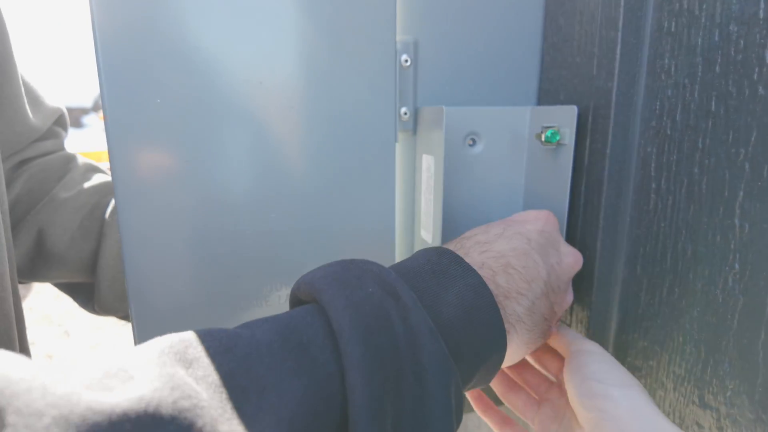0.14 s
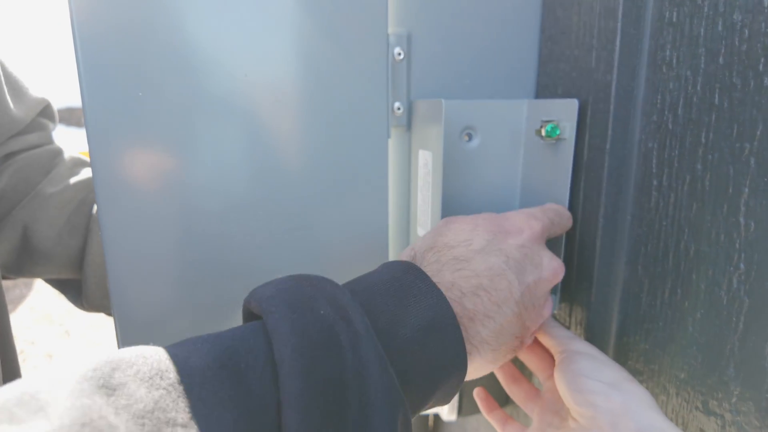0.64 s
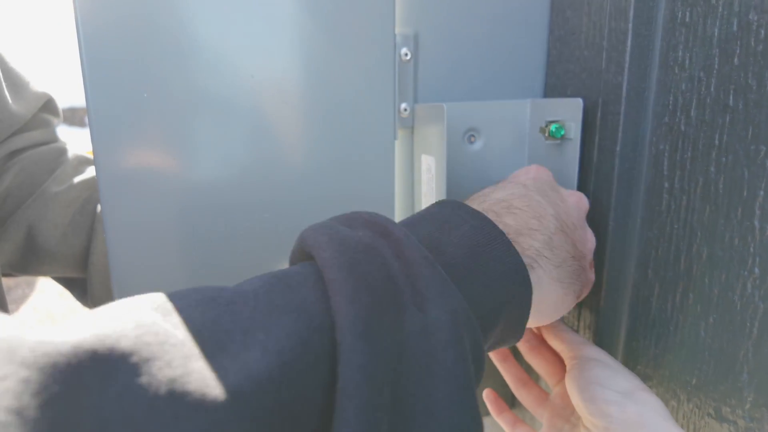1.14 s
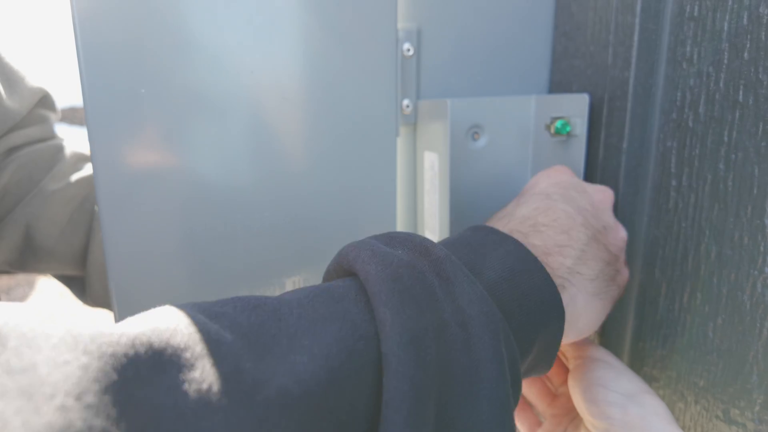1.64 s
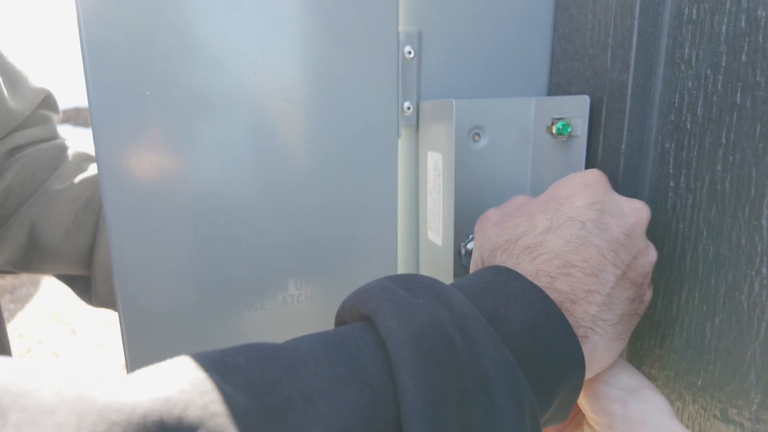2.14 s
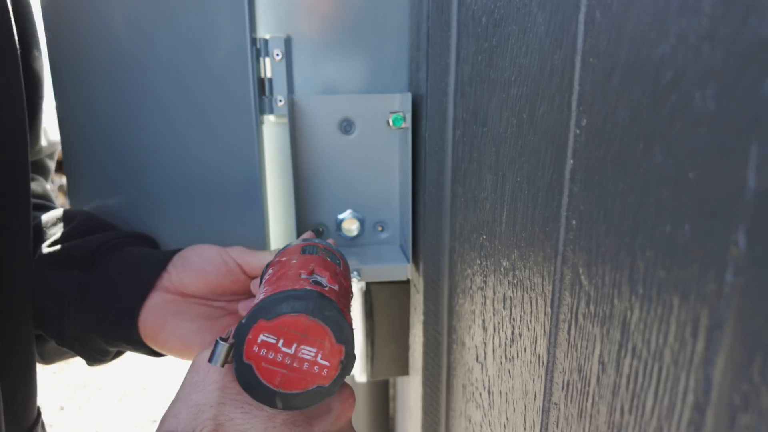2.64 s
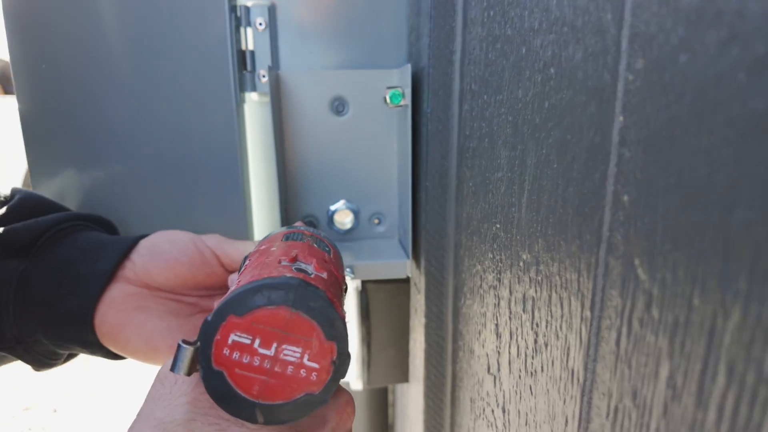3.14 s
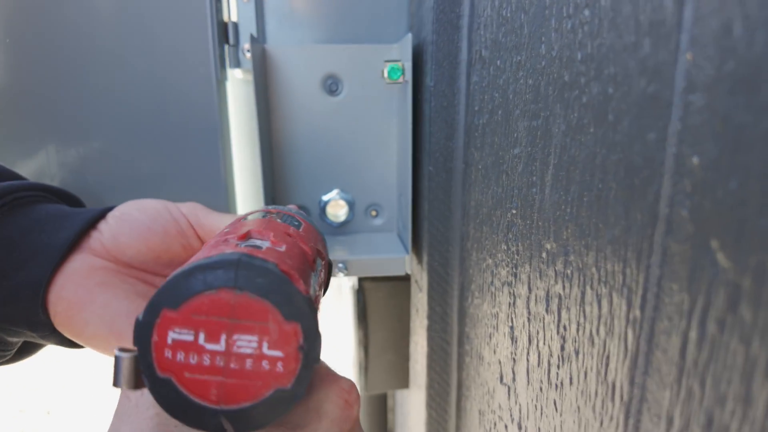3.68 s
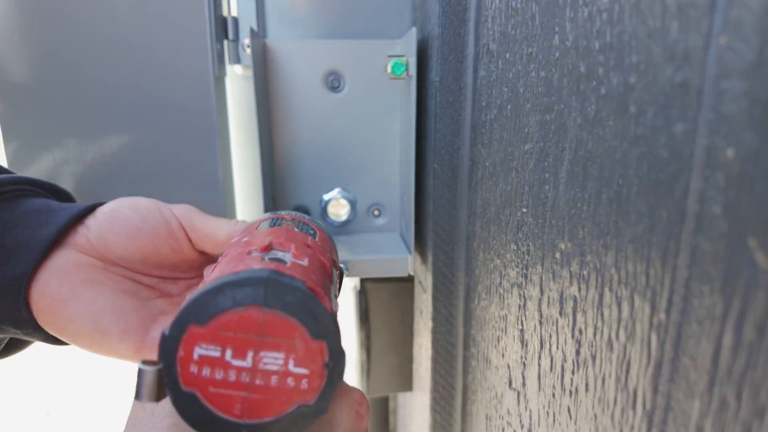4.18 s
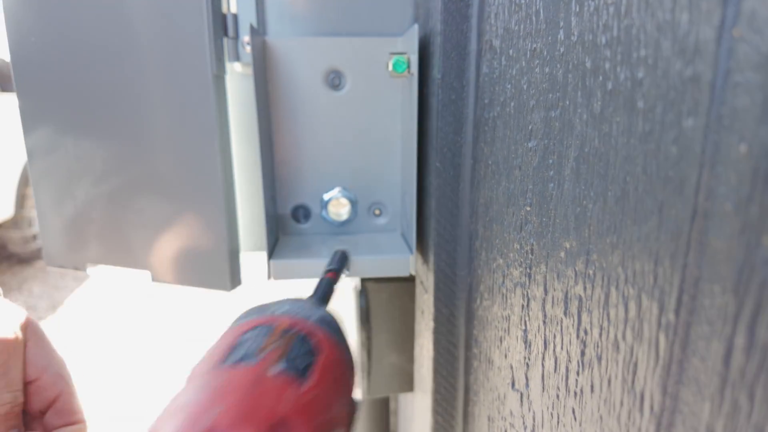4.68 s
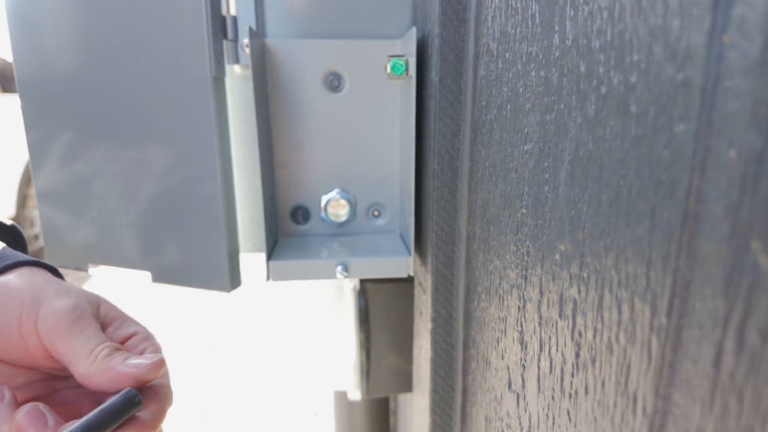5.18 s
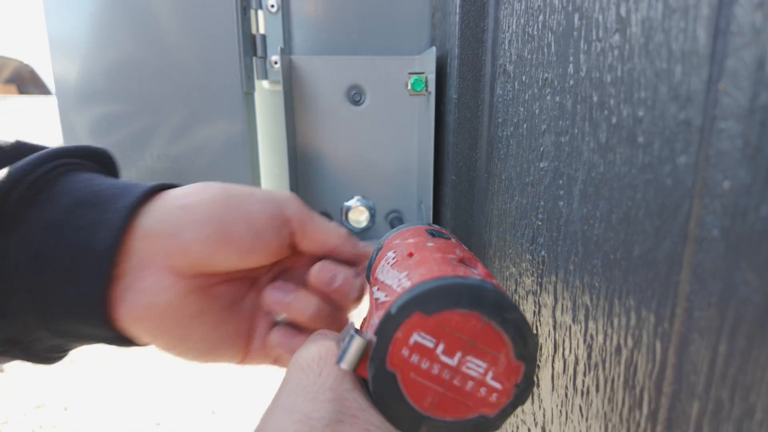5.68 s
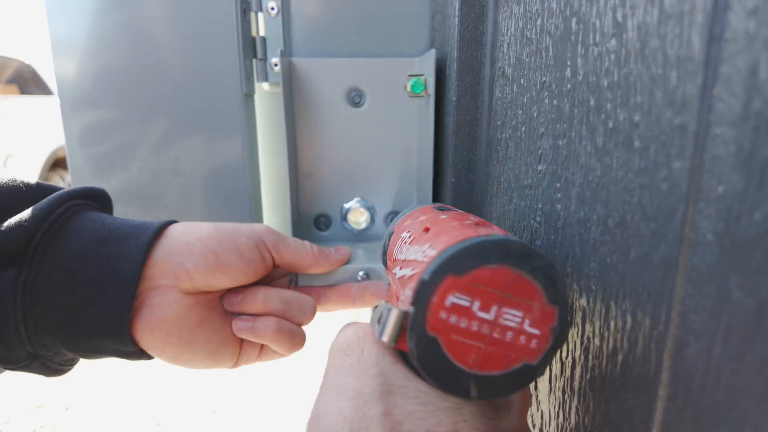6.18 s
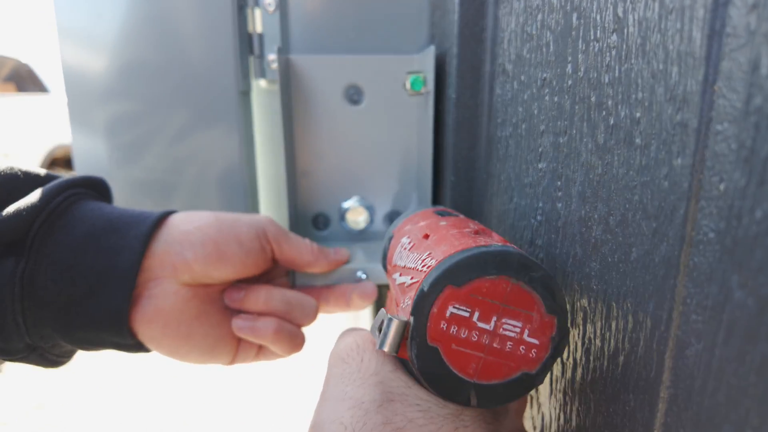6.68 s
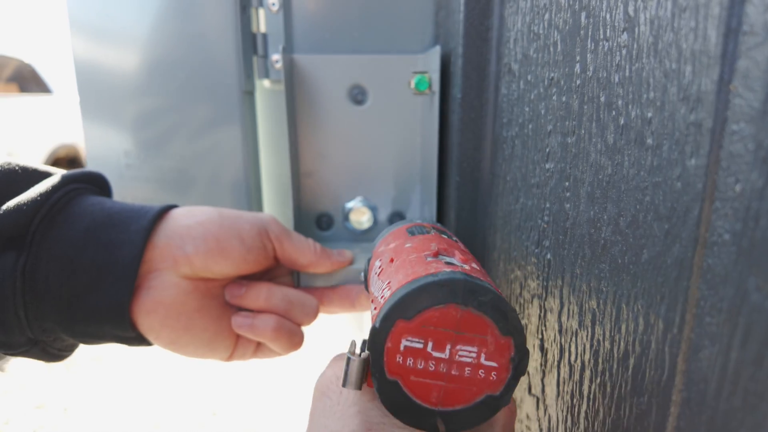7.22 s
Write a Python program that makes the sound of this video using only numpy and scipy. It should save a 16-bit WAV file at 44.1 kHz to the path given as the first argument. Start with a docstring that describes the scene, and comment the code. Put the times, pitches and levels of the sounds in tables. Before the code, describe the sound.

Fingers thread a nut on a sheet-steel box with taps and scrapes, then a cordless impact driver hammers in three loud, ringing bursts.

```python
"""A cordless impact driver runs three bursts on a sheet-steel box: the motor spins up, then its hammer strikes
the anvil about 55 times a second. Each blow is a short push sent through the box's own modes, which ring on after
each burst. Before that, fingers thread a nut onto a bolt: taps and noisy scrapes pass through the same kind of box.
Faint shaped noise makes the quiet outdoor air. One close microphone hears it all through a peak limiter."""
import sys
import numpy as np
from scipy import signal
from scipy.fft import rfft, irfft, next_fast_len
from scipy.io import wavfile
from scipy.ndimage import uniform_filter1d, minimum_filter1d

SR = 44100
rng = np.random.default_rng(int(sys.argv[2]) if len(sys.argv) > 2 else 0)


def int16_out(signal):
    """Quantize to a 16-bit WAV file."""
    q = np.round(np.clip(np.atleast_2d(signal).T, -1, 1) * 32767)
    wavfile.write(sys.argv[1], SR, q.astype(np.int16))


def amplitude_ratio(level_db):
    """Convert a level in decibels to the matching linear amplitude (field) ratio."""
    exponent = np.asarray(level_db, float) / 20
    return 10 ** exponent


N = 323253
T = np.arange(N) / SR  # seconds
FADE_OUT_S = 5.41  # the first fastener's ring is faded out here; the second fastener comes after this

# Tone of the box under fingers. Each row: frequency in Hz, relative level in dB per Hz.
TOUCHED = [(24, -66), (40, -6), (444, 4), (1070, -20), (1210, -3.5), (1760, -13), (1950, -9), (4340, -19.5),
           (10700, -40), (16000, -63.5)]
# Half blows as the hammer first meets the anvil. Each entry: time in seconds.
HALF_BLOWS_S = [3.499, 5.999, 6.931, 6.9413]


def colour(x, points):
    """Shape the spectrum of x by (Hz, dB) points, joined by straight lines over log frequency."""
    hz, db = np.transpose(points)
    f = np.maximum(np.arange(len(x) // 2 + 1) * SR / len(x), 1)
    gain = amplitude_ratio(np.interp(np.log(f), np.log(hz), db))
    return irfft(rfft(x) * gain, len(x))


def unit(x):
    """Scale to energy 1 along the last axis."""
    return x / np.sqrt(np.sum(x ** 2, axis=-1, keepdims=True))


def split(x):
    """Three bands: boom below 700 Hz, clang between, crack above 2800 Hz."""
    bands = []
    for hz, kind in ((700, "low"), ((700, 2800), "band"), (2800, "high")):
        sos = signal.butter(3, hz, kind, fs=SR, output="sos")
        bands.append(signal.sosfilt(sos, x))
    return np.array(bands)


def modes(table, t):
    """Fading sines, each started at rest; t60 is the time to fade by 60 dB."""
    return sum(amplitude_ratio(db) * np.sin(2 * np.pi * hz * t) * 1000. ** (-t / t60) for hz, db, t60 in table)


def box(points, fade, panel_db, quick_s, linger_db):
    """Answer of the steel box to one push, by band: crowded modes as fading noise, plus a few panel modes."""
    # Fading of the crowded modes. Each row: frequency in Hz, t60 in seconds before the fade factor.
    dense_t60 = [(60, 1), (300, 0.75), (1000, 0.71), (3000, 0.51), (6000, 0.36), (16000, 0.24)]
    # Short panel modes. Each row: frequency in Hz, relative level in dB.
    panel_modes = [(112, -17), (180, -4), (302, -4), (508, -3), (567, 2), (934, -6), (1005, -2), (1180, -1),
                   (1389, -4), (1742, -3.5)]
    t = T[:3 * SR // 2]
    hz, t60 = np.transpose(dense_t60)
    burst = rng.standard_normal(len(t))
    # among the sheet's crowded modes a few stand out as thin lines
    line_gain = amplitude_ratio(3.4 * rng.exponential(size=len(t) // 2 + 1))
    sheet = irfft(rfft(burst) * line_gain, len(t))
    dense = 0
    for f in 45 * 2 ** np.arange(0, 8.6, .5):
        band = signal.butter(2, (f / 1.19, min(f * 1.19, 20000)), "band", fs=SR, output="sos")
        noisy, lined = unit(signal.sosfilt(band, [burst, sheet]))
        # most energy leaves at once through the contact, sooner in the treble; the rest lingers in the sheet
        quick = quick_s * (f / 1000) ** -.5
        slow = np.interp(np.log(f), np.log(hz), t60) * fade
        leaving = noisy * 1000. ** (-t / quick)
        lingering = amplitude_ratio(linger_db) * lined * 1000. ** (-t / slow)
        dense = dense + unit(leaving + lingering) * np.sqrt(f)
    # 2000 samples of room in front while the tone is shaped
    size = next_fast_len(len(t) + SR)
    padded = np.roll(np.pad(dense, (0, size - len(t))), 2000)
    dense = np.roll(colour(padded, points), -2000)[:len(t)]
    # higher panel modes fade faster
    panel = modes([(f, db, 0.15 * fade * (f / 1000) ** -.4) for f, db in panel_modes], t)
    return unit(split(unit(dense) + amplitude_ratio(panel_db) * unit(panel)))


def strike(push, answer):
    """Send each band of the pushes through its band of the box and add them up."""
    return signal.fftconvolve(push, answer, axes=1)[:, :N].sum(axis=0)


def pushes(times, band_db, chatter_s, tick):
    """At each time a sharp tick and a chatter of contact that swells and fades, with a level for each band."""
    out, t = np.zeros((3, N + 4000)), T[:4000]
    chance = rng.standard_normal((len(times), len(t)))
    for s, db, c, length in zip(times, band_db, chance, np.maximum(chatter_s, 1e-4)):
        chatter = unit(c * np.sqrt(t / length) * np.exp(-t / length))
        burst = unit(chatter + tick * (t == 0))
        first = int(s * SR)
        out[:, first:first + len(t)] += np.outer(amplitude_ratio(db), burst)
    return out[:, :N]


def faded_out(x):
    """From FADE_OUT_S on, x fades out within a few hundredths of a second."""
    return x * np.exp(-np.maximum(T - FADE_OUT_S, 0) / .02)


def air():
    """A faint low outdoor murmur: noise shaped in tone and set to an rms of -61 dB."""
    # Tone of the murmur. Each row: frequency in Hz, relative level in dB per Hz.
    murmur_tone = [(15, -32.5), (25, 12.5), (575, -19), (734, -24), (1190, -21.5), (16000, -49)]
    x = colour(rng.standard_normal(N), murmur_tone)
    return amplitude_ratio(-61) * x / np.std(x)


def rub():
    """Thread and skin catch and slip: dense tiny clicks of uneven size into a box that fades very soon."""
    # Finger strokes on nut and tool. Each row: time of peak in seconds, scrape (middle band) in dB,
    # rumble relative to the scrape in dB, seconds to swell by 20 dB, seconds to fade by 20 dB.
    strokes = [(0.03, -62.5, 14, 0.18, 0.14), (0.19, -59, 6.5, 0.18, 0.37), (0.34, -49, 0, 0.17, 0.13),
               (0.47, -60.5, -3, 0.16, 0.42), (0.63, -63.5, 20.5, 0.047, 0.13),
               (0.669, -37.5, -4, 0.03, 0.034), (0.83, -50.5, -8, 0.34, 0.12), (1.27, -53, -8, 0.11, 0.028),
               (1.36, -55, -10, 0.059, 0.55), (1.438, -31.5, -9, 0.044, 0.057),
               (1.55, -54.5, -2, 0.35, 0.069), (1.799, -36.5, -4.5, 0.017, 0.095),
               (1.829, -37, -24, 0.049, 0.041), (1.93, -65.5, -4, 0.093, 0.28),
               (2.11, -33.5, -10.5, .014, 0.08), (2.5, -57, -4, 0.174, 0.03),
               (2.53, -47.5, -14, 0.022, 0.031), (2.59, -46, -28, 0.046, 0.034),
               (2.641, -49.5, -27, 0.22, 0.0053), (2.71, -78, 18, 0.077, 0.68),
               (3.075, -58.5, 5, 0.023, 0.53), (3.41, -67, 3.5, 0.23, 0.098), (5.7, -58, -10, 0.049, 0.15)]
    size = amplitude_ratio(2.5 * np.minimum(rng.exponential(size=N), 6))
    grit = rng.standard_normal(N) * size * (rng.random(N) < .15)
    power = 0
    for s, peak_db, rumble_db, swell, fade in strokes:
        db = peak_db - 20 * np.where(T < s, (s - T) / swell, (T - s) / fade)
        # harder rubbing is brighter
        bands_db = np.array([db + rumble_db, db, 1.168 * db + 0.5])
        power = power + amplitude_ratio(bands_db) ** 2
    push = np.sqrt(power) * grit / np.std(grit)
    return strike(push, box(TOUCHED, fade=0.069, panel_db=-1.0, quick_s=0.048, linger_db=-13.5))


def knocks():
    """Single taps on steel; the one at 4.72 s meets a box with stronger panel modes and a shorter fade."""
    # Knocks of nut, washer and bit. Each row: start in seconds, level in dB before the shared lift below,
    # boom relative to that level in dB, crack relative to that level in dB.
    taps = [(0.027, -27.5, -7.5, -16), (0.09, -39, -20, -8), (0.212, -18.5, -8, -10), (0.317, -33, -42, -4),
            (0.473, -36.5, -9, -7.5), (0.644, -31, -8, -8), (0.748, -28, -17, -6.5), (0.826, -43, -41, -1),
            (1.037, -16.5, -8.5, -9.5), (1.216, -43, -23, -1.5), (1.248, -40, -29, -0.5),
            (1.334, -40.5, -5, -11), (1.557, -44, 5.5, -31), (1.38, -39.5, -20, -2.5),
            (1.623, -46, -27, -16), (1.669, -39.5, -23, -3), (1.703, -42, 0.5, -15), (2.003, -39, 7.5, -15),
            (2.043, -46, -6, -5), (2.135, -22, -28.5, -0.5), (2.362, -44.5, -7, -12), (2.392, -45, -6, -13),
            (2.422, -28, 1.5, -15.5), (2.574, -39.5, -31, 1), (2.677, -49, 4.5, 3), (3.097, -42, 10, -30),
            (3.151, -42.5, 0.5, -10), (3.445, -36, -6.5, 1), (4.72, -26.5, -36, -0.5),
            (5.685, -47, 9.5, -13), (6.877, -43, -18, -5.5), (6.887, -29, -26, -22),
            (6.897, -41.5, 6.5, 16)]
    lift_db = 21.5
    s, db, boom, crack = np.transpose(taps)
    db = np.array([db + boom, db, db + crack]).T + lift_db
    apart = (s > 4.5) & (s < FADE_OUT_S)  # the tap at 4.72 s
    shorter = box(TOUCHED, fade=.5, panel_db=1.5, quick_s=.05, linger_db=-18)
    out = faded_out(strike(pushes(s[apart], db[apart], np.full(len(s), .0015), tick=2.5), shorter))
    # all the others land on three spots in turn
    for spot in range(3):
        mine = ~apart & (np.arange(len(s)) % 3 == spot)
        answer = box(TOUCHED, fade=.6, panel_db=-7.5, quick_s=.13, linger_db=-17)
        out = out + strike(pushes(s[mine], db[mine], np.full(len(s), .0014), tick=1.1), answer)
    return out


def ticks():
    """Dry ticks of small parts, too light to ring the box: a few milliseconds of noise around a centre."""
    # Each row: start in seconds, level in dB of the noise before its band filter, centre in Hz.
    small_parts = [(0.173, -55, 6000), (0.295, -61, 8000), (1.9694, -69, 5000), (3.32, -40, 1020),
                   (5.4026, -50, 8600), (5.809, -45, 1233), (5.8683, -44.5, 2350)]
    out, t = np.zeros(N), T[:1500]
    chance = rng.standard_normal((len(small_parts), len(t)))
    for (s, db, hz), c in zip(small_parts, chance):
        band = signal.butter(1, (hz / 2.1, hz * 1.5), "band", fs=SR, output="sos")
        first = int(s * SR)
        out[first:first + len(t)] += amplitude_ratio(db) * signal.sosfilt(band, c) * np.exp(-t / .0045)
    return out


def motor():
    """Each pull: the speed control sings, gears whine upwards and rush; the brake stops them quickly."""
    # Trigger pulls. Each row: pulled in seconds, released in seconds, motor level in dB.
    pulls = [(3.413, 4.412, -25.5), (5.902, 6.611, -27), (6.876, 7.238, -30.5)]
    # Gear whine. Each row: multiple of the gear tone, level relative to the motor in dB.
    whine_tones = [(1, -5), (2.15, -10)]
    # Tone of the rush. Each row: frequency in Hz, relative level in dB per Hz.
    rush_tone = [(59, -39.5), (100, -7.5), (1050, -8), (2180, -5), (2420, -2.5), (15000, -34.5)]
    gear_hz, switch_hz, switch_db = 2150, 9900, -62.5  # gear tone at full speed; song of the speed control
    rush = colour(rng.standard_normal(N), rush_tone)
    low, mid, high = split(rush / np.std(rush))
    out = 0
    for on, off, db in pulls:
        spin_up = np.clip((T - on - .012) / .09, 0, 1) ** .8
        speed = spin_up * np.exp(-np.maximum(T - off, 0) / .045)  # 1 = full speed
        turn = 2 * np.pi * gear_hz * np.cumsum(speed) / SR
        whine = sum(amplitude_ratio(w) * np.sin(k * turn) for k, w in whine_tones)
        # once the hammer loads the gears their whine is smothered
        whine = whine * np.exp(-np.maximum(T - on - .08, 0) / .008)
        sing = (T > on) * np.exp(-np.maximum(T - on, 0) / 0.056) * np.sin(2 * np.pi * switch_hz * T)
        # the treble comes only with speed
        running = speed ** 1.5 * (low + mid + speed ** 0.69 * high + whine)
        out = out + amplitude_ratio(db) * running + amplitude_ratio(switch_db) * sing
    return out


def blow_times():
    """A blow each time the hammer's pace has added up to one more, besides the first half blows."""
    # Hammering in each burst. Each row: first full blow in seconds, power cut in seconds,
    # pace in blows per second before the changes below, its sag in blows per second each second.
    bursts = [(3.5123, 4.3516, 61.26, 14.14), (6.012, 6.5063, 63.32, 22.71), (6.949, 7.1896, 58.57, 2.32)]
    # the hammer starts short of its pace, catches up, and coasts down for a few blows after the power is cut
    start_shortfall, catch_up_s, coast_s, stop_s = .437, .072, .1515, .063
    # the first fastener gives way and the hammer runs faster
    slip_s, slip_blows_per_s = 4.2, 7.93
    times = list(HALF_BLOWS_S)
    for first, cut, rate, sag in bursts:
        t = T[:int((cut + stop_s - first) * SR)]
        pace = rate - sag * t + slip_blows_per_s * (first < slip_s) * (first + t > slip_s)
        pace = pace * (1 - start_shortfall * np.exp(-t / catch_up_s))
        pace = pace * np.exp(-np.maximum(first + t - cut, 0) / coast_s)
        struck = np.cumsum(pace) / SR
        times += list(first + np.interp(np.arange(int(struck[-1]) + 1), struck, t))
    return np.sort(times)


def hammer():
    """Anvil blows of uneven strength and timing; the bit shifts, so each blow finds its own mix of box modes."""
    # Pressure on the tool. Each row: time in seconds, blow level in dB as if averaged over 55 blows a second,
    # shake in dB (how freely the box booms under the blow).
    pressure = [(3.498, -27.5, 8), (3.516, -13, 4), (3.581, -23, 2.5), (3.679, -17, -6.5), (3.854, -19, 1),
                (4.149, -18.5, -8), (4.238, -21, -2), (4.299, -9, 4.5), (4.362, -16, -4),
                (4.395, -35.5, 13), (5.998, -25.5, 7.5), (6.011, -18, -5), (6.151, -23, 1.5),
                (6.503, -18.5, -7), (6.566, -23.5, 6.5), (6.928, -28.5, 7), (6.943, -15, 0),
                (6.998, -19.5, 1), (7.1, -18.5, -14), (7.2, -17.5, -6.5), (7.226, -16.5, 2),
                (7.248, -24, 2.5)]
    # Tone under the hammer: one list for each of the two fasteners.
    # Each row: frequency in Hz, relative level in dB per Hz.
    struck_tone = [
        [(24, -63.5), (40, -45.5), (171, 4), (570, 0), (790, -9.5), (1020, -2.5), (1900, -10), (2210, -6),
         (3470, -12), (8990, -15), (16000, -42.5)],
        [(24, -49), (40, -46), (167, 2), (556, -2), (751, -8), (1440, -4), (1720, -8), (3060, -11.5),
         (5310, -21.5), (6650, -18.5), (16000, -45)],
    ]
    # Short ping of bit and anvil, one row for each fastener.
    # Each row: frequency in Hz, level relative to the crack in dB, t60 in seconds.
    bit_pings = [(2250, -2, .03), (3050, -12, .03)]
    clang_db, clang_per_shake = 4, .48  # middle band over the blow, and how far it follows the shake
    ping_dulls_s, ping_dulls_db, ping_scatter_db = 4.03, -9, 3  # the first bit seats and pings less
    times = blow_times()
    s, crack, shake = np.transpose(pressure)
    clang = crack + clang_db + clang_per_shake * shake
    db = np.array([np.interp(times, s, v) for v in (crack + shake, clang, crack)]).T
    chance = rng.standard_normal((len(times), 9))
    # scatter of whole blows and of single bands, then from average level to energy of one blow
    db = db + .8 * chance[:, :1] + 1.5 * chance[:, 1:4] + 10 * np.log10(SR / 55)
    drag = np.where(np.isin(times, HALF_BLOWS_S), 3, 1)  # half blows drag on longer
    times = times + .0004 * chance[:, 4]
    chatter_s = .0017 * drag * amplitude_ratio(2.5 * chance[:, 5])
    before, after = T < FADE_OUT_S, T > FADE_OUT_S
    # each blow shares its energy among three seats of the bit
    seat_db = 20 * np.log10(np.abs(unit(chance[:, 6:])))
    first_side, rest = np.zeros(N), np.zeros(N)
    for seat in seat_db.T:
        push = pushes(times, db + seat[:, None], chatter_s, tick=1.0)
        first_box = box(struck_tone[0], fade=0.96, panel_db=-7.5, quick_s=.05, linger_db=-21.5)
        first_side += strike(push * before, first_box)
        second_box = box(struck_tone[1], fade=0.79, panel_db=-9.5, quick_s=0.064, linger_db=-19)
        rest += strike(push * after, second_box)
    dulled = (times > ping_dulls_s) * (times < FADE_OUT_S)
    ping_db = db[:, 2] + ping_scatter_db * chance[:, 6] + ping_dulls_db * dulled
    tick = pushes(times, np.outer(ping_db, np.ones(3)), chatter_s / 2, tick=0.5)[0]
    for side, (hz, level_db, t60) in zip((before, after), bit_pings):
        ping = unit(modes([(hz, 0, t60)], T[:SR // 10]))
        rest += amplitude_ratio(level_db) * signal.fftconvolve(tick * side, ping)[:N]
    return faded_out(first_side) + rest


def ring():
    """Box and door ring on in clean lines after each burst, having swelled over its last blows."""
    # The tool eases off and the long modes ring free.
    # Each row: time in seconds, which fastener (0 the first, 1 the second).
    eases = [(4.4, 0), (6.6, 1), (7.26, 1)]
    # Long box and door modes. Each row: frequency in Hz, level in dB after the first fastener,
    # level in dB after the second, t60 in seconds.
    long_modes = [(541, -36, -50, 1.05), (589, -29, -33, .6), (1092, -26, -46, 1.2), (1212, -27, -62, 1.2),
                  (1347, -33, -38, .55), (1463, -33, -42, .75), (1760, -35, -47, .75),
                  (1805, -34, -46, 1.15), (1945, -33, -48, .8), (2033, -49, -54, 1.3),
                  (2108, -50, -46, 1.5), (2229, -43, -49, 1.1), (2358, -42, -63, 1), (2388, -46, -42, 1.3),
                  (2707, -42, -53, .8), (2751, -35, -56, .6), (2805, -41, -44, .7), (2901, -54, -52, 1.3),
                  (3140, -51, -50, 1), (3522, -36, -52, .5), (3951, -48, -45, .45)]
    swell_s = .05
    out = np.zeros((2, N))
    phases = 2 * np.pi * rng.random((len(eases), len(long_modes)))
    for (s, side), start in zip(eases, phases):
        first = int((s - 5 * swell_s) * SR)
        t = T[first:first + SR + SR // 2] - s
        lines = sum(amplitude_ratio(dbs[side]) * np.sin(2 * np.pi * hz * t + p) * 1000. ** (-np.maximum(t, 0) / t60)
                    for (hz, *dbs, t60), p in zip(long_modes, start))
        out[side, first:first + len(t)] += np.exp(np.minimum(t, 0) / swell_s) * lines
    return faded_out(out[0]) + out[1]


def clanks():
    """The driver's socket clanks on steel and rings its few short modes; gentler clanks have weaker high modes."""
    # Each row: start in seconds, level in dB.
    hits = [(4.719, -19.5), (5.654, -55.5)]
    # Modes of the socket. Each row: frequency in Hz, level relative to the clank in dB
    # (as in the first clank), t60 in seconds.
    socket_modes = [(1149, 4, 0.07), (2190, -7, 0.067), (2940, -14, 0.16), (3800, -11.5, 0.049),
                    (4460, -15, 0.074)]
    out, lowest_hz = 0, socket_modes[0][0]
    for s, db in hits:
        softer_db = db - hits[0][1]
        dulled = [(hz, m + 0.2 * softer_db * np.log2(hz / lowest_hz), t60) for hz, m, t60 in socket_modes]
        out = out + amplitude_ratio(db) * modes(dulled, np.maximum(T - s, 0))
    return out


def scene():
    """All sources added at the one microphone."""
    return (air() + rub() + knocks() + ticks() + motor() + hammer() + ring() + clanks())[None]


def band_limit(x):
    """A steep low-pass at the top of the band."""
    return signal.sosfilt(signal.butter(12, 16000, fs=SR, output="sos"), x)


def record(dry):
    """The microphone drops the bass below 85 Hz, and a look-ahead limiter holds the peaks at -0.8 dB."""
    x = signal.sosfilt(signal.butter(4, 85, "high", fs=SR, output="sos"), dry)
    need = np.minimum(1, amplitude_ratio(-.8) / (np.abs(x) + 1e-9))
    hold = int(.003 * SR)
    # the lowest gain needed nearby, smoothed
    gain = uniform_filter1d(minimum_filter1d(need, 2 * hold), hold)
    return band_limit(x * gain)


dry = scene()
out = record(dry)
int16_out(out)
```